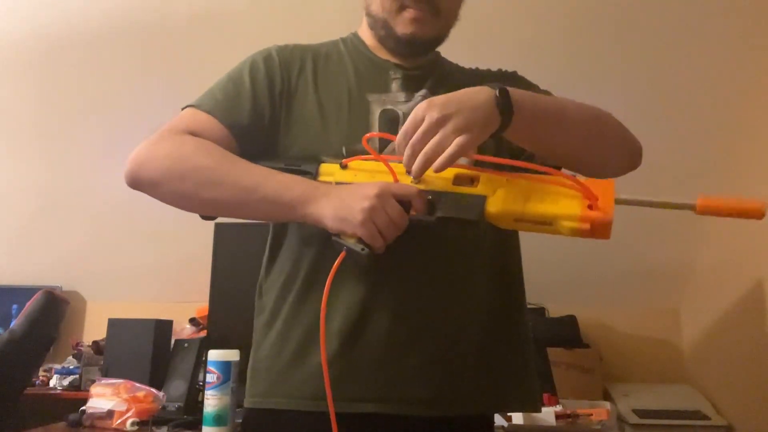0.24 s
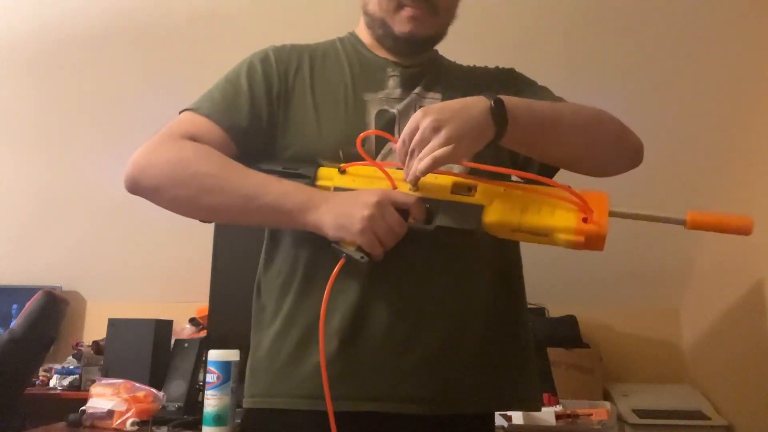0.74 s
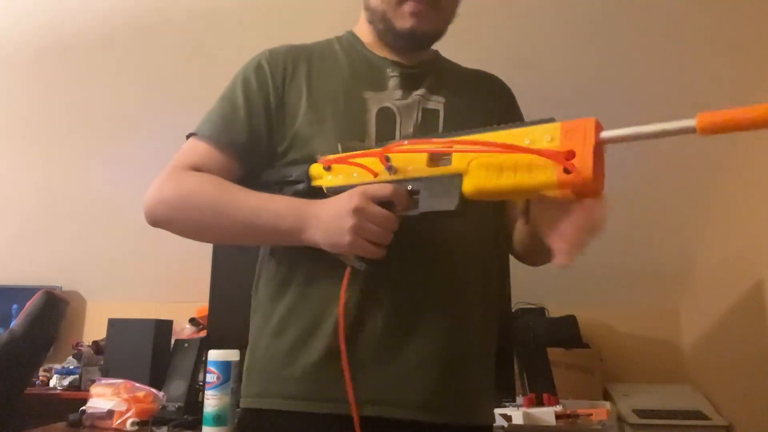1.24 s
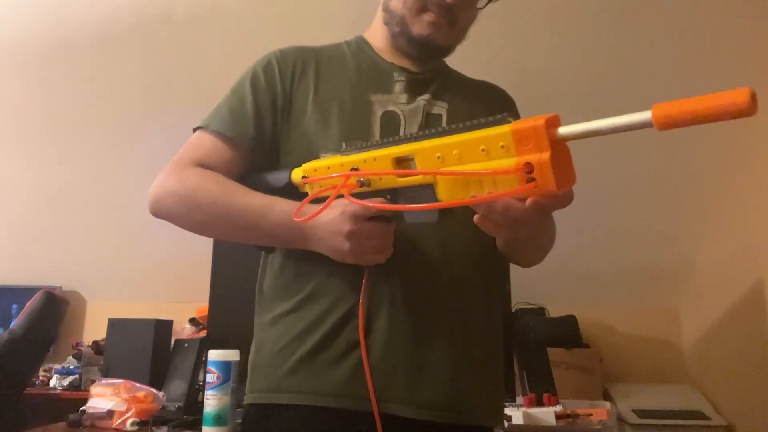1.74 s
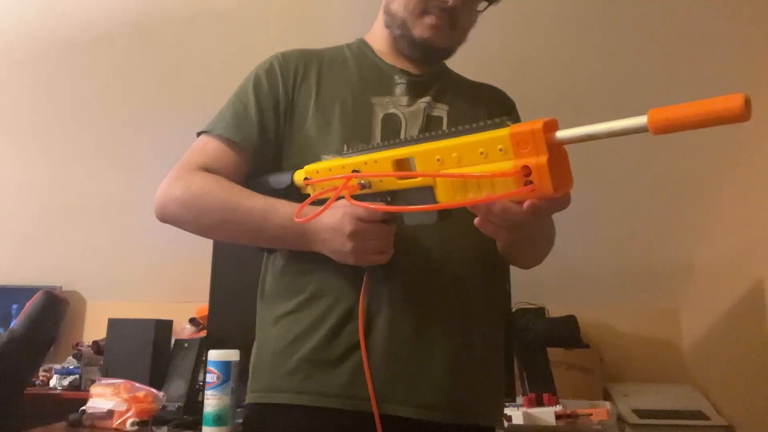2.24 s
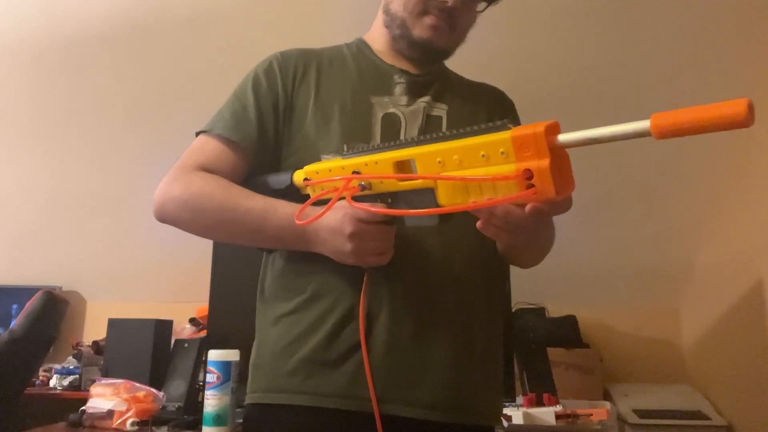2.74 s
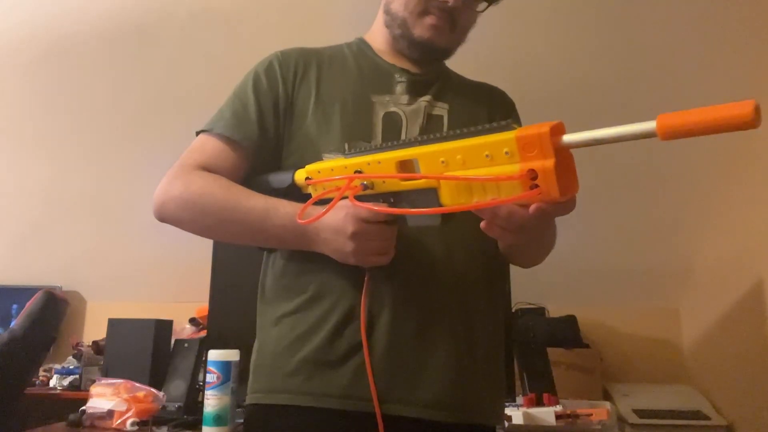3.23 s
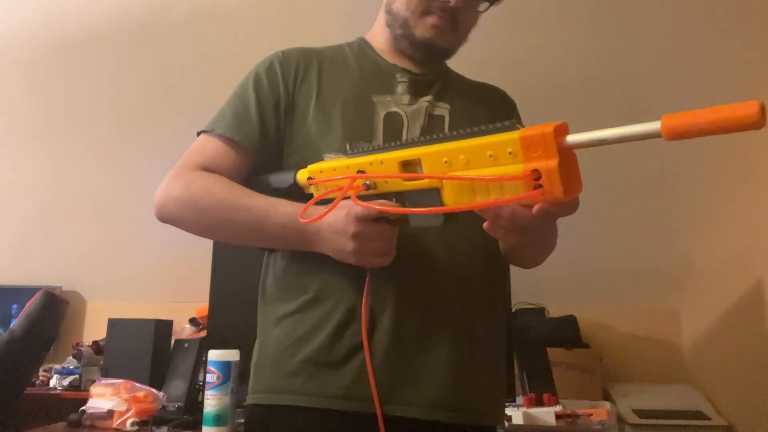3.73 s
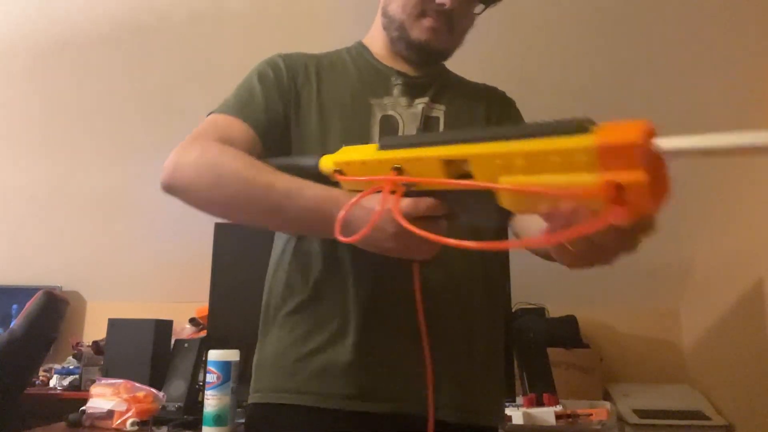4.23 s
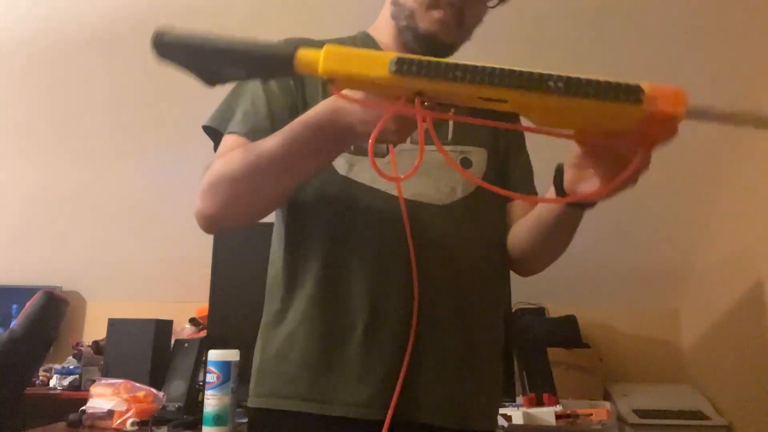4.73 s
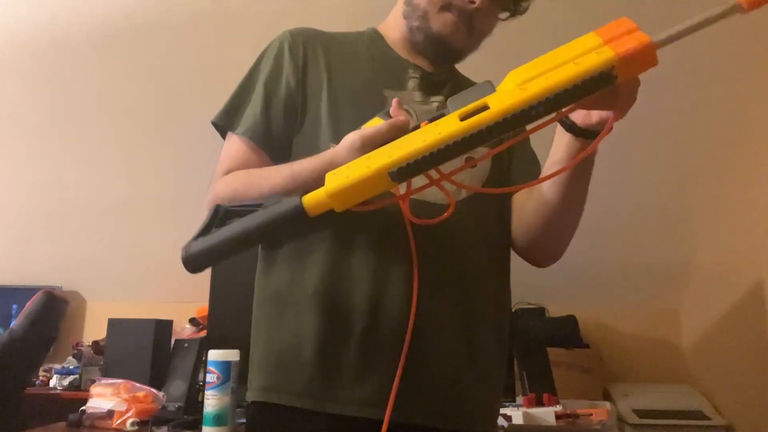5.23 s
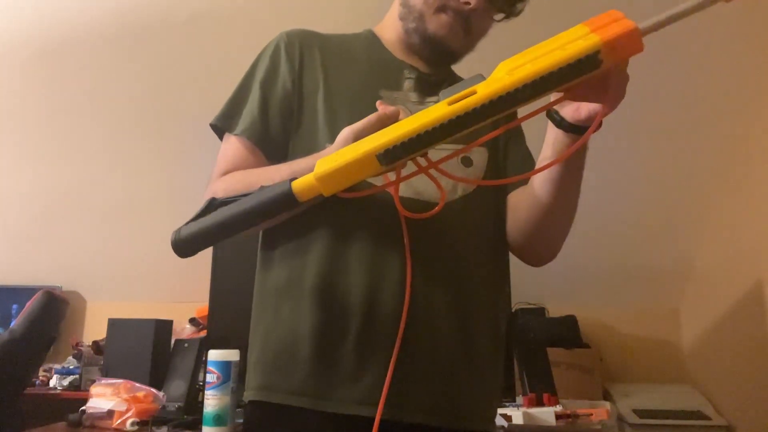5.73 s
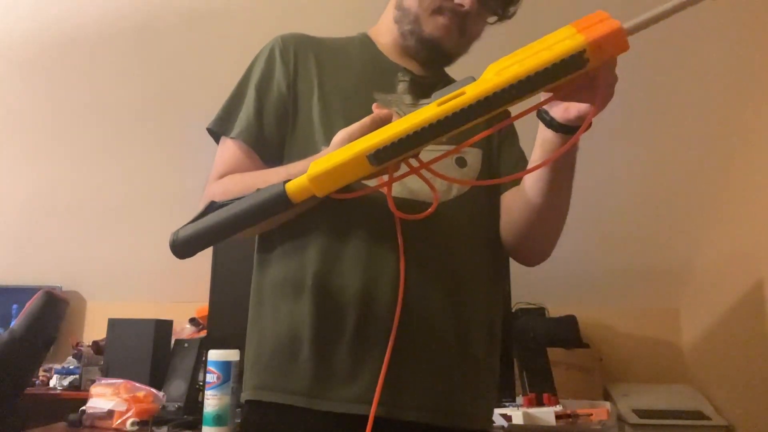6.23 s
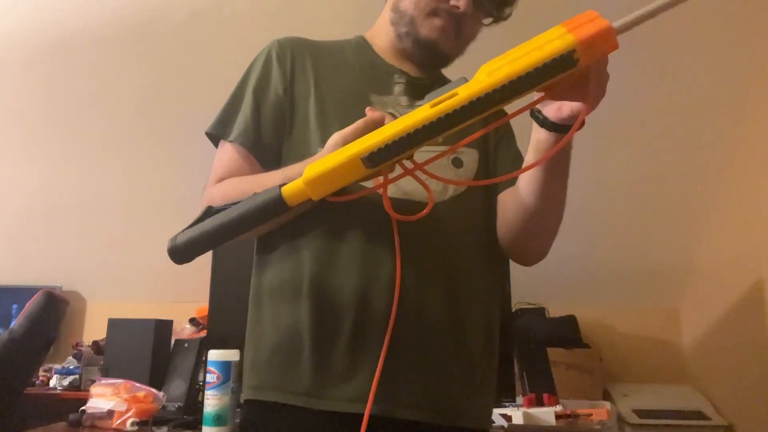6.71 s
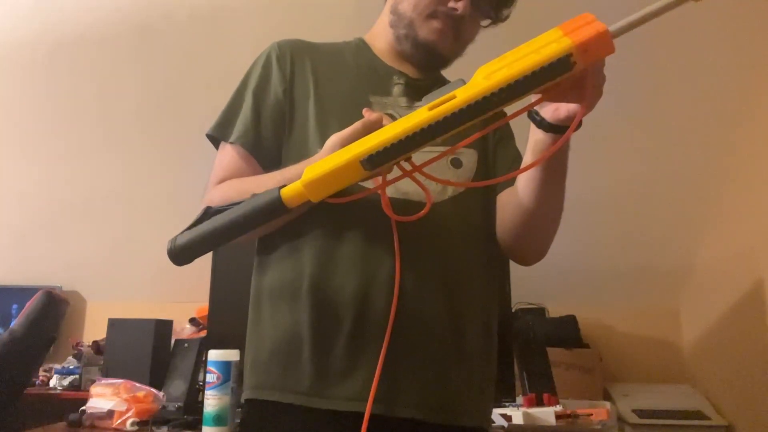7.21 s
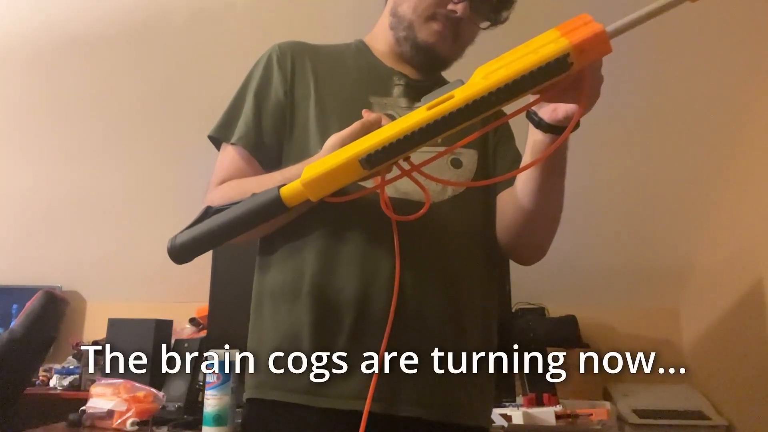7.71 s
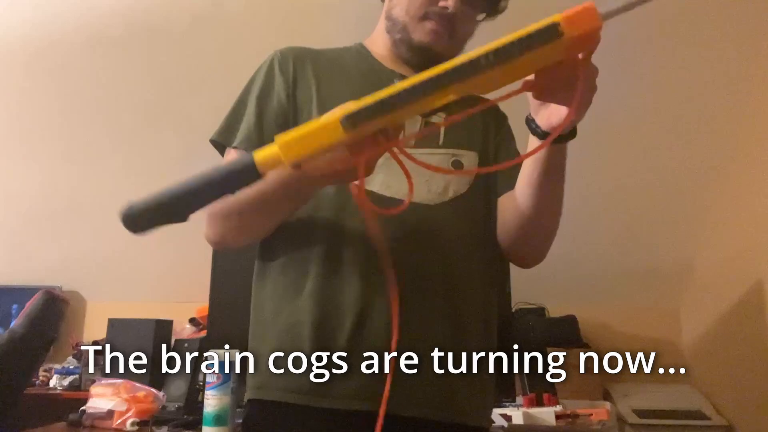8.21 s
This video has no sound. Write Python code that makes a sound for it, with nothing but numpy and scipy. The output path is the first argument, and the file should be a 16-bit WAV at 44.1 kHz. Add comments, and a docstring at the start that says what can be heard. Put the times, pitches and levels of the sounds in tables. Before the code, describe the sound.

A toy air blaster is handled close to the microphone in a small room with faint low rush and mains hum. After soft bumps, trigger clicks lead to a sharp bright air blast ending in a pop. About a second later the valve sputters and shuts with a hollow ring. Plastic rubs and clicks follow, then a second blast and a fainter release.

```python
"""Air blaster in a small room

A toy blaster on a compressed-air hose is fired twice: each shot is a hissing jet, shaped noise whose level
follows the air flow, with a thud of recoil as it opens and a ringing pop of the barrel near its end.
When the trigger is let go, the valve vents, sputters and shuts with a hollow ring of decaying tones.
Between shots the plastic is handled (short noises and rings) over a low rush, a rumble and a mains hum."""
import sys
import numpy as np
from scipy import signal
from scipy.fft import rfft, irfft, next_fast_len
from scipy.io import wavfile

SR = 44100
rng = np.random.default_rng(int(sys.argv[2]) if len(sys.argv) > 2 else 0)


def master_out(mix):
    """Clip the mix to full scale and print it as 16-bit PCM to the path in sys.argv[1]."""
    frames = np.transpose(np.atleast_2d(mix))
    ceiling = np.clip(frames, -1, 1)
    pcm = np.round(ceiling * 32767).astype(np.int16)
    wavfile.write(sys.argv[1], SR, pcm)


N = 373086
TIME = np.arange(N) / SR  # seconds

# Levels in dB are set before the mix. Spectra give only a shape: the noise made from them has rms 1.
# "t60" is the time a sound takes to die away by 60 dB.

# The shots. Each row: valve opens in seconds, rise in seconds, valve shuts in seconds, jet level in dB,
# barrel pops in seconds, pitch factor of the pop.
SHOTS = [(2.071, .0063, 2.201, -16.5, 2.179, .95), (5.979, 0.018, 6.113, -15.5, 6.0949, 1.08)]
# Colour of the jet's hiss. Each row: frequency in Hz, relative level in dB per Hz.
JET_SPECTRUM = [(100, -30.5), (300, -21.5), (600, -15.5), (1000, -15), (1650, -5.5), (2200, -9.5),
                (3000, -3), (3900, -3), (4900, -6.5), (7800, -1.5), (10800, -2), (12300, 2), (14000, -3),
                (15600, -6)]
# The jet sings in the barrel. Each row: frequency in Hz, width in Hz, relative level in dB.
BARREL_SINGING = [(1526, 70, -6), (3689, 130, -2), (4010, 110, 0.5), (5950, 54, -4), (6140, 50, -4),
                  (6720, 60, -5), (11850, 110, 0)]
# Tones of the barrel's pop, before its pitch factor. Each row: frequency in Hz, relative level in dB, t60 in seconds.
BARREL_TONES = [(697, -10, 0.036), (1126, -0.5, .028), (1210, -0.5, 0.014), (1594, -2, 0.023),
                (1995, 0.5, 0.039), (2650, -7.5, 0.02)]
POP_DB = -15  # level of the pop of a shot
RECOIL_DB, RECOIL_PITCH = -31.5, 1.7  # recoil relative to the jet for a usual rise; its pitch factor

# The trigger is let go. Each row: valve cracks open in seconds, rise in seconds, first spurt in dB,
# hiss in dB, valve seats in seconds, ring level in dB, ring pitch in Hz.
RELEASES = [(3.278, 0.0227, -37, -51, 3.411, -33, 239), (6.648, 0.015, -59.5, -52, 6.786, -35.5, 239.4)]
# The exhaust spits hiss and pops. Each row: start in seconds, spit level in dB, pop level in dB, pitch factor.
SPUTTERS = [(3.342, -43, -39, 1), (3.363, -44.5, -39.5, 1.32), (3.399, -34, -39, 1.17),
            (3.4085, -37, -38.5, 1.03), (6.7525, -43, -39.5, 1.35), (6.767, -42.5, -38, 1.34),
            (6.7805, -37.5, -45, 1.3)]
# Colour of the venting hiss. Each row: frequency in Hz, relative level in dB per Hz.
VENT_SPECTRUM = [(200, -32.5), (1500, -10.5), (2800, -11), (3900, -2.5), (5000, -6.5), (8200, -3),
                 (10800, -3), (12600, -4), (15600, -4.5)]
# Colour of the throaty part of the exhaust. Each row: frequency in Hz, relative level in dB per Hz.
CHUFF_SPECTRUM = [(200, -26.5), (800, -21), (1250, -1.5), (1800, -1.5), (2700, -3.5), (4200, -1),
                  (7000, -7), (15600, -24)]
# The barely open valve sings. Each row: frequency in Hz, width in Hz, relative level in dB.
VALVE_SINGING = [(1330, 230, -7), (6170, 240, 0), (12560, 400, 0.5)]
# The chamber, a tube closed at one end. Each row: multiple of the ring pitch, relative level in dB, t60 in seconds.
CHAMBER_TONES = [(1, -5, 0.31), (3.05, -2, 0.041), (5.1, -4, .04)]
SPURT_T60, SEAT_T60, SPIT_T60 = .1, .03, .025  # seconds: first spurt, flow stopping at the seat, one spit
CHUFF_DB, CHUFF_GROWS_DB = -48.5, 10.5  # throaty part as the valve seats; its growth over the release

# Clicks of trigger and shell. Each row: start in seconds, level in dB, brightness in dB per octave, t60 in seconds.
CLICKS = [(1.112, -65, 1, 0.068), (2.0064, -37, 0.5, .033), (2.0297, -42, -2, 0.045),
          (2.036, -47, 3.5, .034), (4.401, -50.5, -3.5, 0.0403), (5.162, -69, 2, 0.048),
          (8.3338, -57, -4, 0.047)]
# Colour of the plastic shell's clicks. Each row: frequency in Hz, relative level in dB per Hz.
SHELL_SPECTRUM = [(200, -14.5), (700, -9), (1300, -1.5), (2400, 2), (3600, 2.5), (5000, -5.5), (7000, -6.5),
                  (15600, -13)]
# Duller knocks of the shell in the hands. Each row: start in seconds, level in dB.
KNOCKS = [(.905, -60.5), (1.687, -60.5), (2.0063, -43.5), (4.234, -55), (4.401, -50.5), (5.599, -53),
          (8.3335, -58.5)]
# What a knock rings. Each row: frequency in Hz, width in Hz, relative level in dB.
SHELL_MODES = [(1130, 200, -2), (1591, 240, -3.5), (2220, 560, -6), (3503, 600, -16.5)]
# The trigger spring pings. Each row: start in seconds, level in dB.
PINGS = [(5.478, -63), (7.182, -71)]
# What a ping rings. Each row: frequency in Hz, width in Hz, relative level in dB.
SPRING_MODES = [(6480, 240, 7.5), (5060, 1000, -7)]
# Hands, shirt and hose slide on the shell. Each row: middle in seconds, length in seconds, level in dB.
RUBS = [(.895, .068, -75), (1.335, 0.22, -75.5), (4.185, 0.28, -68.5), (4.255, 0.076, -62.5),
        (4.37, .08, -65.5), (4.729, 0.034, -60.5), (7.2, .06, -77), (8.229, 0.089, -74)]
# Colour of the sliding and of the leak's hiss. Each row: frequency in Hz, relative level in dB per Hz.
CLOTH_SPECTRUM = [(300, -9.5), (1500, -1.5), (3800, 3), (6000, -5.5), (11000, -3.5), (15600, -7.5)]
# Air seeps past the half-pressed valve. Each row: start in seconds, end in seconds, level in dB.
LEAKS = [(5.656, 5.769, -67.5), (5.948, 5.995, -56.5)]
# Whistling tones of a leak. Each row: middle frequency in Hz, relative level in dB.
WHISTLE_TONES = [(1990, 1.5), (3365, -2), (4156, -13), (7230, -12.5)]
# The body shifts its weight. Each row: start in seconds, level in dB.
BUMPS = [(.205, -51), (.76, -59.5), (1.319, -56), (2.68, -57), (3.785, -57), (4.015, -58.5), (5.409, -62),
         (5.772, -49.5)]
BUMP_PITCH = 0.65  # pitch factor of those bumps
# Colour of thuds (before their pitch factor) and of the rumble. Each row: frequency in Hz, relative level in dB per Hz.
THUD_SPECTRUM = [(15, -33.5), (40, -6), (70, -3), (110, -10), (250, -31), (800, -79.5)]

# How long the room's echo lasts. Each row: frequency in Hz, t60 in seconds.
ROOM_T60 = [(150, 0.29), (700, 0.23), (1800, 0.39), (5000, 0.4), (9000, 0.34), (15000, 0.21)]
# Likeness of the left and right echo, thuds and background in each band.
# Each row: frequency in Hz, likeness (1 is identical, 0 unrelated).
LIKENESS = [(30, 0.33), (60, 0.68), (130, .65), (400, .45), (1000, .15), (4000, -.1), (10000, 0.97)]
# Extra phase turn between left and right. Each row: frequency in Hz, turn in radians.
PHASE_TURN = [(100, -.2), (900, -1.9), (1550, -3), (2300, -4.85), (3900, -8), (5200, -13), (15000, -12.9)]

# Course of the room's low rush, which the hum partly follows. Each row: time in seconds, relative level in dB.
RUSH_LEVEL = [(0.0, -61.5), (1.51, -62), (2.02, -61), (2.71, -61.5), (3.04, -66.5), (3.27, -67),
              (3.56, -63.5), (4.22, -63), (5.28, -67.5), (5.58, -62), (5.98, -60.5), (6.64, -67),
              (7.12, -63), (7.35, -69.5), (7.78, -70), (8.06, -61.5), (8.22, -65.5), (8.46, -69.5)]
# Colour of the low rush. Each row: frequency in Hz, relative level in dB per Hz.
RUSH_SPECTRUM = [(30, -30.5), (100, -6), (160, -5.5), (250, -6), (350, -2.5), (470, -1.5), (720, -7.5),
                 (860, -5.5), (1100, -14), (1600, -26.5), (3000, -60.5)]
# Course of the low rumble. Each row: time in seconds, relative level in dB.
RUMBLE_LEVEL = [(0.0, -62.5), (1.91, -72), (2.17, -69), (3.27, -80), (4.19, -70.5), (5.04, -80),
                (5.61, -76), (8.46, -84.5)]
# Colour of the faint hiss. Each row: frequency in Hz, relative level in dB per Hz.
HISS_SPECTRUM = [(500, -16.5), (1200, -1), (1900, -9), (2600, -9.5), (3700, -16), (4300, -15.5),
                 (5500, -22.5), (7900, -29.5), (10700, -28.5), (15800, -41.5)]
# Tones of the mains hum. Each row: frequency in Hz, relative level in dB.
HUM_TONES = [(119.6, -71.5), (359, -76.5), (479, -81)]
TOP_HZ = 15850  # band limit of the finished sound


def amp(db):
    """Turn decibels into a gain."""
    return 10 ** (np.asarray(db) / 20)


def decay(t, t60):
    """A gain that falls by 60 dB in t60 seconds."""
    return amp(-60 * t / t60)


def unit(x):
    """Scale a sound to rms 1."""
    return x / np.sqrt(np.mean(x ** 2) + 1e-20)


def along(points, hz):
    """Join (Hz, value) points by straight lines on a log frequency axis."""
    f, value = np.transpose(points)
    return np.interp(np.log(hz + 1), np.log(f + 1), value)


def course(points):
    """Join (seconds, value) points by straight lines over the whole scene."""
    return np.interp(TIME, *np.transpose(points))


def filtered(x, response):
    """Multiply the spectrum of x by a response, which may also turn the phase."""
    n = x.shape[-1]
    m = next_fast_len(n + 8192)
    return irfft(rfft(x, m) * response(np.fft.rfftfreq(m, 1 / SR)), m)[..., :n]


def noise(spectrum, size=N, tilt_db=0):
    """Noise of rms 1 with a given spectrum, tilted by tilt_db per octave above 1 kHz."""
    def response(hz):
        octaves = np.log2(np.maximum(hz, 1000) / 1000)
        return amp(along(spectrum, hz) + tilt_db * octaves)
    return unit(filtered(rng.standard_normal(size), response))


def resonances(modes):
    """The response of a few damped resonances, added with alternating sign."""
    def response(f):
        total = 0
        for k, (center, width, db) in enumerate(modes):
            damping = 1j * f * width
            total = total + (-1) ** k * amp(db) * damping / (center * center - f * f + damping)
        return total
    return response


def singing(modes):
    """Steady noise of rms 1 heard through resonances."""
    return unit(filtered(rng.standard_normal(N), resonances(modes)))


def wobble(rate):
    """A smooth random curve with rate knots a second."""
    knots = rng.standard_normal(int(N * rate / SR) + 4)
    smooth = signal.resample_poly(knots, 10, 1)
    return np.interp(TIME * rate * 10, np.arange(len(smooth)), smooth)


def add(track, s, sound):
    """Mix a short sound into a track at s seconds."""
    start = max(round(s * SR), 0)
    track[start:start + len(sound)] += sound[:N - start]


def jets(sag_db_per_s=22, shut_t60=0.11, flutter_db=.9, singing_db=-15, crack_db=3, crack_s=.008):
    """The jet overshoots as the valve opens, roars, sags with the pressure and dies as the barrel empties."""
    flow = np.zeros(N)
    for opens, rise, shuts, db, _, _ in SHOTS:
        age = np.maximum(TIME - opens, 0)
        opening = np.minimum(age / rise, 1) ** 2
        overshoot_db = crack_db * np.exp(-(age / (2 * crack_s)) ** 2)
        emptying = decay(np.maximum(TIME - shuts, 0), shut_t60)
        flow += opening * amp(db + overshoot_db - sag_db_per_s * age) * emptying
    flutter = amp(flutter_db * wobble(130))
    return flow * flutter * (noise(JET_SPECTRUM) + amp(singing_db) * singing(BARREL_SINGING))


def pops(attack_s=.001, bend=.25, bend_s=.002):
    """A slug of air leaves the tube, which rings with a quickly falling pitch: at each shot, fainter at each sputter."""
    out, t = np.zeros(N), TIME[:SR // 8]
    # this clock starts fast and slows to normal, so the pitch falls
    clock = t + bend * bend_s * (1 - np.exp(-t / bend_s))
    events = [(s, POP_DB, pitch) for *_, s, pitch in SHOTS]
    events += [(s, db, pitch) for s, _, db, pitch in SPUTTERS]
    for s, db, pitch in events:
        ring = np.zeros(len(t))
        for hz, level, t60 in BARREL_TONES:
            cycles = hz * pitch * clock + rng.random()
            ring += amp(level) * decay(t, t60) * np.sin(2 * np.pi * cycles)
        add(out, s, amp(db) * ring * (1 - np.exp(-t / attack_s)))
    return out


def vents(sputter_db=1.2, chuff_sputter_db=3, singing_db=-5):
    """The exhaust starts with a thin, singing spurt, then grows throaty and spits until the valve seats."""
    spurt, hiss, chuff = np.zeros((3, N))
    for opens, rise, spurt_db, hiss_db, seats, _, _ in RELEASES:
        age = np.maximum(TIME - opens, 0)
        flow = np.minimum(age / rise, 1) ** 2 * decay(np.maximum(TIME - seats, 0), SEAT_T60)
        still_to_go = np.clip((seats - TIME) / (seats - opens), 0, 1)
        spurt += flow * amp(spurt_db) * decay(np.maximum(age - rise, 0), SPURT_T60)
        hiss += flow * amp(hiss_db)
        chuff += flow * amp(CHUFF_DB - CHUFF_GROWS_DB * still_to_go)
    for s, db, _, _ in SPUTTERS:
        add(hiss, s, amp(db) * decay(TIME[:SR // 8], SPIT_T60))
    sputter = wobble(220)
    thin_song = amp(singing_db) * spurt * singing(VALVE_SINGING)
    venting = (spurt + hiss) * amp(sputter_db * sputter) * noise(VENT_SPECTRUM)
    throaty = chuff * unit(amp(chuff_sputter_db * sputter) * noise(CHUFF_SPECTRUM))
    return venting + thin_song + throaty


def chamber(attack_s=0.0033, snap_db=-7, snap_t60=0.015):
    """The valve snaps shut and the air column, closed at one end, rings near odd multiples of its pitch."""
    out, t = np.zeros(N), TIME[:SR // 2]
    for *_, seats, db, hz in RELEASES:
        ring = np.zeros(len(t))
        for multiple, level, t60 in CHAMBER_TONES:
            ring += amp(level) * decay(t, t60) * np.sin(2 * np.pi * multiple * hz * t)
        snap = amp(snap_db) * decay(t, snap_t60) * noise(VENT_SPECTRUM, size=len(t))
        add(out, seats, amp(db) * (ring * (1 - np.exp(-t / attack_s)) + snap))
    return out


def clicks():
    """Dry ticks of the plastic shell: decaying noise, each with its own brightness."""
    out, t = np.zeros(N), TIME[:SR // 4]
    for s, db, tilt_db, t60 in CLICKS:
        add(out, s, amp(db) * decay(t, t60) * noise(SHELL_SPECTRUM, size=len(t), tilt_db=tilt_db))
    return out


def bursts(rows, modes, t60):
    """Short decaying puffs of noise that ring a set of resonances."""
    out, t = np.zeros(N), TIME[:SR // 4]
    for s, db in rows:
        puff = rng.standard_normal(len(t)) * decay(t, t60)
        ring = filtered(puff, resonances(modes))
        start_rms = np.sqrt(np.mean(ring[:SR // 200] ** 2))  # over the first 5 ms
        add(out, s, amp(db) * ring / start_rms)
    return out


def knocks():
    """Dull knocks: short noise rings the broad resonances of the shell."""
    return bursts(KNOCKS, SHELL_MODES, t60=0.029)


def spring_pings():
    """The trigger spring pings: longer noise rings its high resonances."""
    return bursts(PINGS, SPRING_MODES, t60=0.098)


def rubs(grain_db=2.0):
    """Each stroke of sliding noise swells and fades, grainy with tiny slips."""
    speed = sum(amp(db) * np.exp(-(2 * (TIME - s) / length) ** 2) for s, length, db in RUBS)
    return speed * unit(amp(grain_db * wobble(400)) * noise(CLOTH_SPECTRUM))


def leaks(edge_s=0.0087, waver=.012, flicker_db=4, hiss_db=-8):
    """Air in a narrow gap whistles, with wavering pitch and flickering level, over a little hiss."""
    flow, tones = np.zeros(N), np.zeros(N)
    for start, end, db in LEAKS:
        flow += amp(db) * np.clip(np.minimum(TIME - start, end - TIME) / edge_s, 0, 1)
    for hz, db in WHISTLE_TONES:
        level = amp(db + flicker_db * wobble(66))
        pitch = hz * (1 + waver * wobble(300))
        tones += level * np.sin(2 * np.pi * np.cumsum(pitch) / SR)
    return flow * (tones + amp(hiss_db) * noise(CLOTH_SPECTRUM, tilt_db=-4.0))


def bumps(swell_s=0.014, usual_rise_s=0.013):
    """Soft low thuds, drawn anew for each channel; the faster the valve opens, the harder the recoil."""
    out, t = np.zeros((2, N)), TIME[:SR // 4]
    events = []
    for opens, rise, _, db, _, _ in SHOTS:
        harder_db = 20 * np.log10(usual_rise_s / rise)
        events.append((opens + rise, db + RECOIL_DB + harder_db, RECOIL_PITCH))
    events += [(s, db, BUMP_PITCH) for s, db in BUMPS]
    swell = t / swell_s * np.exp(1 - t / swell_s)
    for s, db, pitch in events:
        spectrum = np.multiply(THUD_SPECTRUM, [pitch, 1])
        for channel in out:
            thud = noise(spectrum, size=len(t)) * swell
            start_rms = np.sqrt(np.mean(thud[:SR // 25] ** 2))  # over the first 40 ms
            add(channel, s, amp(db) * thud / start_rms)
    return out


def near_walls(x, echo_db=-15, nearest_s=.003, farthest_s=.014, count=7):
    """Body, desk and wall send early copies that comb the hiss, differently in each channel."""
    out = np.array([x, x])
    for channel in out:
        # the second half has new delays: the blaster is turned over
        for part in np.array_split(np.arange(N), 2):
            for delay in rng.uniform(nearest_s, farthest_s, count):
                add(channel, part[0] / SR + delay, amp(echo_db) * x[part])
    return out


def room(x, onset_s=.0045, count=3):
    """Echo: noise dying at its own pace in each band; several random tails take turns to even out their colour."""
    out = np.zeros((2, N))
    turn = np.arange(N) // 1500 % count  # the next tail takes over every 1500 samples
    for k in range(count):
        hz, t, bands = signal.stft(rng.standard_normal((2, SR // 2)), SR, nperseg=256)
        dying = decay(t, along(ROOM_T60, hz)[:, None])
        tail = signal.istft(bands * dying, SR, nperseg=256)[1]
        tail = tail * (1 - np.exp(-TIME[:tail.shape[1]] / onset_s))
        tail = tail / np.linalg.norm(tail[0])
        out += signal.oaconvolve((x * (turn == k))[None], tail, axes=1)[:, :N]
    return out


def blend_channels(pair):
    """Blend two unrelated signals to a set left-right likeness per band."""
    def blend(hz):
        angle = np.arccos(np.clip(along(LIKENESS, hz), -1, 1)) / 2
        return np.array([np.cos(angle), np.sin(angle)])
    mid, side = filtered(pair, blend)
    return np.array([mid + side, mid - side])


def out_of_step(x, lag_s=.00019):
    """Set left and right out of step by a lag and a phase turn per frequency."""
    def response(hz):
        lead = 2 * np.pi * hz * lag_s + along(PHASE_TURN, hz)
        return np.exp(.5j * lead * np.array([[1], [-1]]))
    return filtered(x, response)


def background(rush_db=3, rumble_db=2, hiss_db=-71.0, patchy_db=0.58, lumpy_db=1.5):
    """Two-channel noise: a lumpy rumble and a low rush that drift in level, under a steady faint hiss."""
    def pair(spectrum):
        return np.array([noise(spectrum), noise(spectrum)])
    rush = amp(course(RUSH_LEVEL) + rush_db + patchy_db * wobble(14)) * pair(RUSH_SPECTRUM)
    rumble = amp(course(RUMBLE_LEVEL) + rumble_db + lumpy_db * wobble(13)) * pair(THUD_SPECTRUM)
    return rush + rumble + amp(hiss_db) * pair(HISS_SPECTRUM)


def hum(level_db=1, unsteady_db=1.5, follows=0.76):
    """Mains hum: slightly unsteady tones that rise and sink with the low rush."""
    drift_db = course(RUSH_LEVEL)
    tones = np.zeros(N)
    for hz, db in HUM_TONES:
        level = amp(db + unsteady_db * wobble(2.8))
        tones += level * np.sin(2 * np.pi * hz * TIME + 0.27 * wobble(5.5))
    return amp(level_db + follows * (drift_db - drift_db.mean())) * tones


def scene(jet_wet_db=-0.5, vent_wet_db=-6, handling_wet_db=-6, ring_wet_db=-14, left_lead_s=.0003):
    """Air and handling, direct and off the walls, over the hum; thuds and background come from the left."""
    jet, vent = jets(), vents()
    handling = clicks() + knocks() + rubs() + leaks() + spring_pings()
    ring = chamber() + pops()
    to_room = amp(jet_wet_db) * jet + amp(vent_wet_db) * vent
    to_room += amp(handling_wet_db) * handling + amp(ring_wet_db) * ring
    echo = blend_channels(room(to_room))
    blaster = out_of_step(near_walls(jet + vent) + handling + ring + echo)

    def from_left(hz):
        return np.exp(1j * np.pi * hz * left_lead_s * np.array([[1], [-1]]))
    low = filtered(blend_channels(bumps() + background()), from_left)
    # gains in dB: everything is a little louder on the left
    return blaster * amp([[.25], [-.25]]) + (low + hum()) * amp([[.6], [-.6]])


def record(dry):
    """Round off the loudest peaks, then remove everything above the band limit."""
    rounded = dry / (1 + np.abs(dry / .85) ** 6) ** (1 / 6)
    return filtered(rounded, lambda hz: np.clip((TOP_HZ - hz) / 200 + .5, 0, 1))


dry = scene()
out = record(dry)
master_out(out)
```